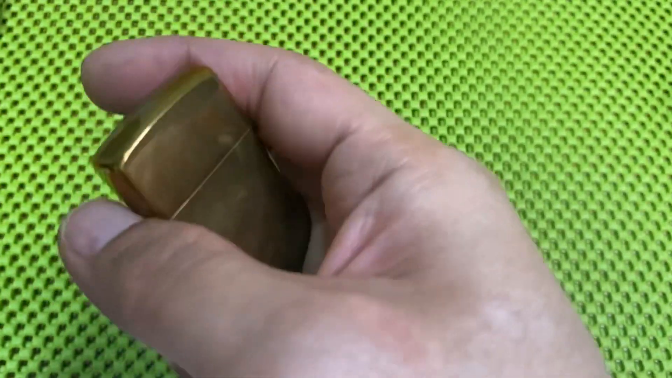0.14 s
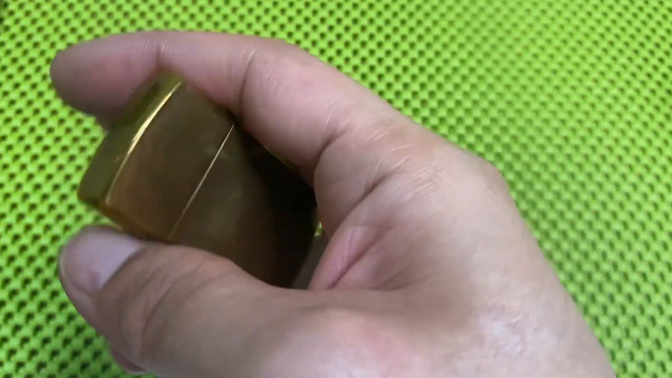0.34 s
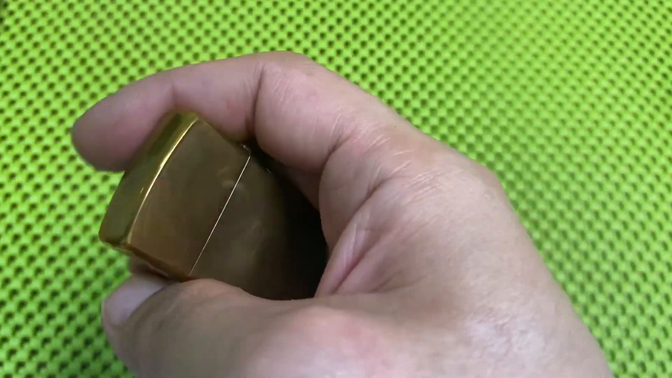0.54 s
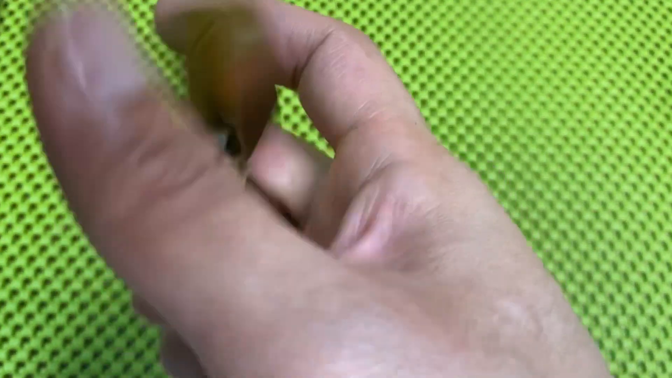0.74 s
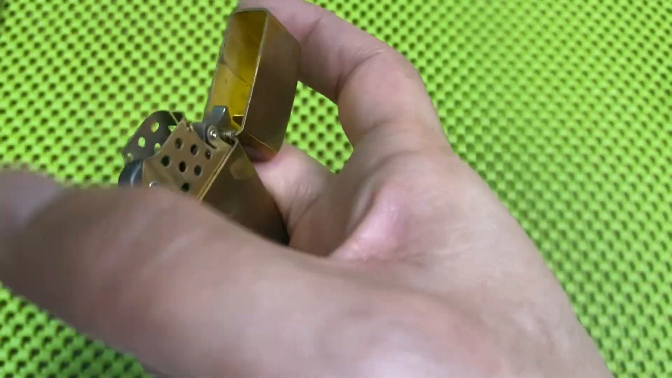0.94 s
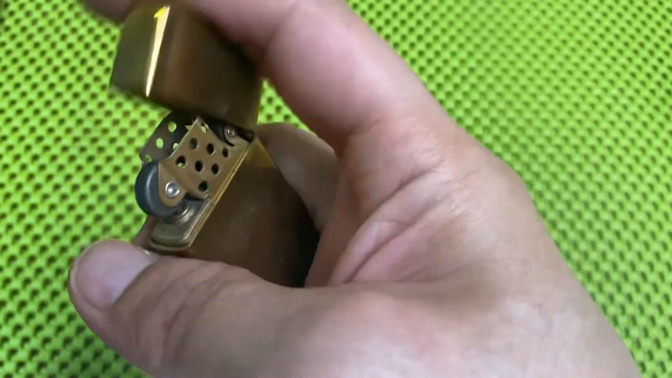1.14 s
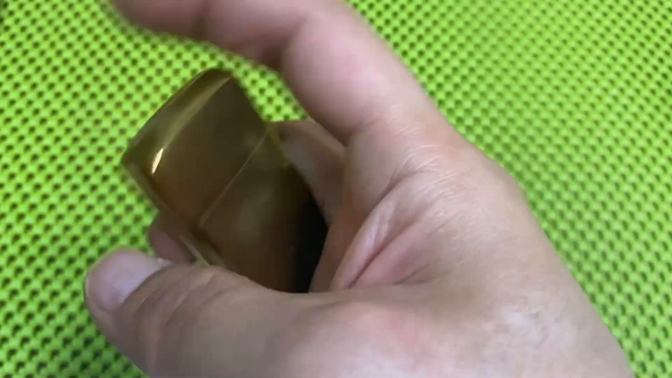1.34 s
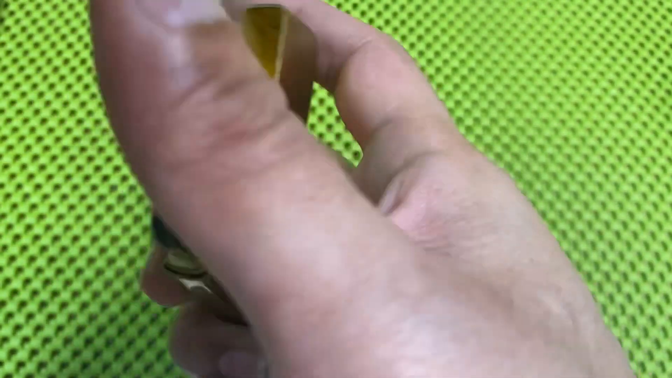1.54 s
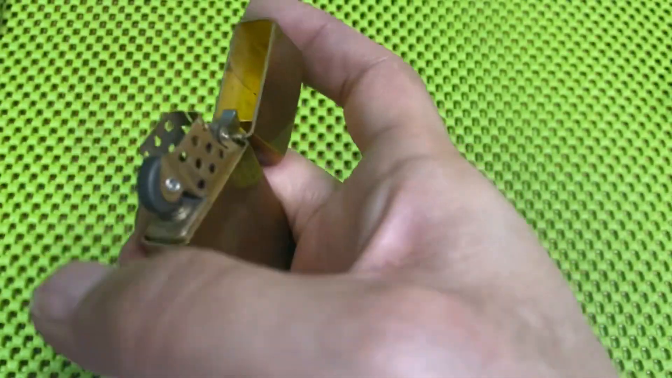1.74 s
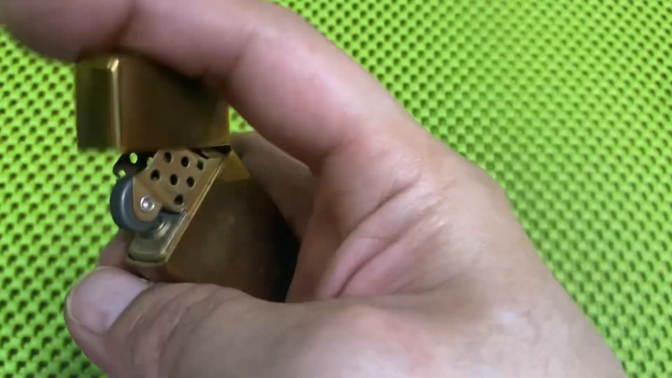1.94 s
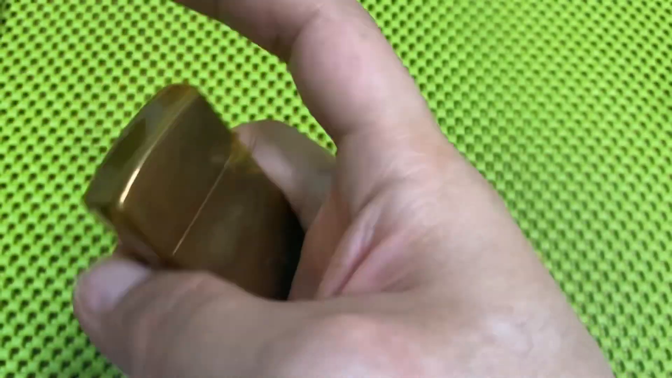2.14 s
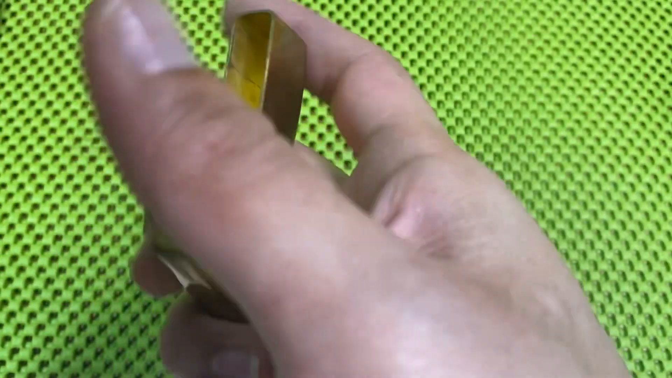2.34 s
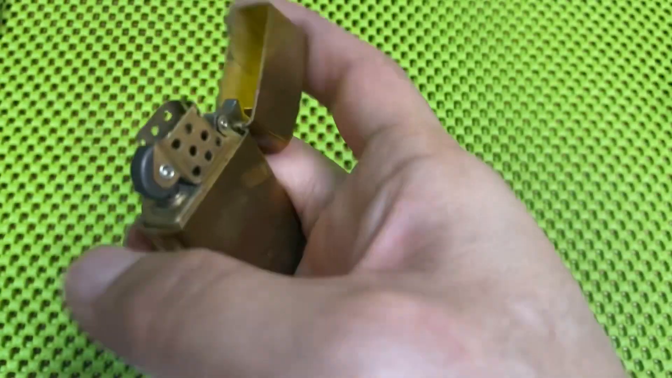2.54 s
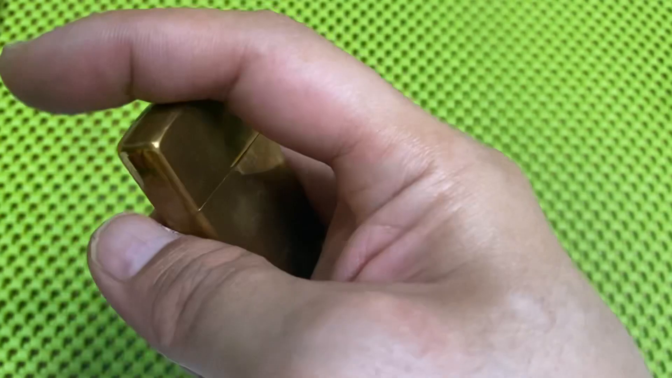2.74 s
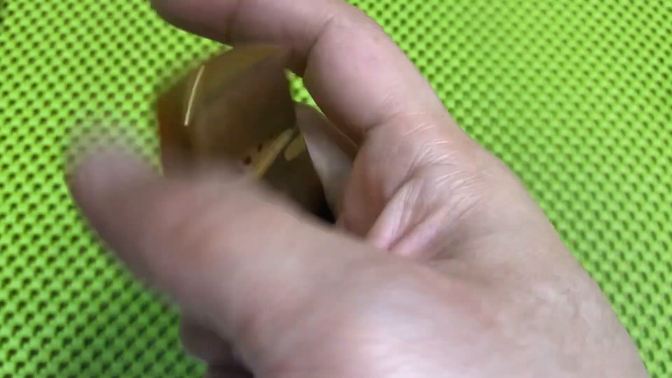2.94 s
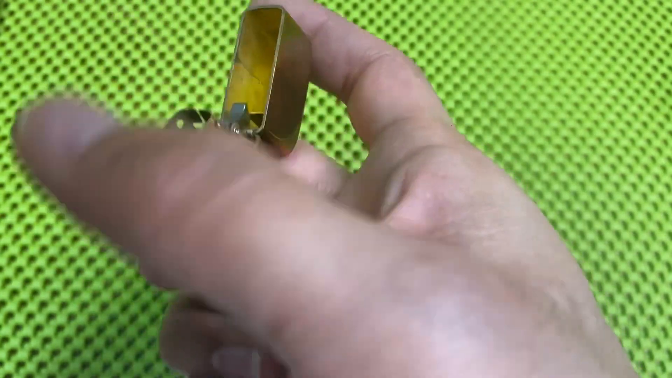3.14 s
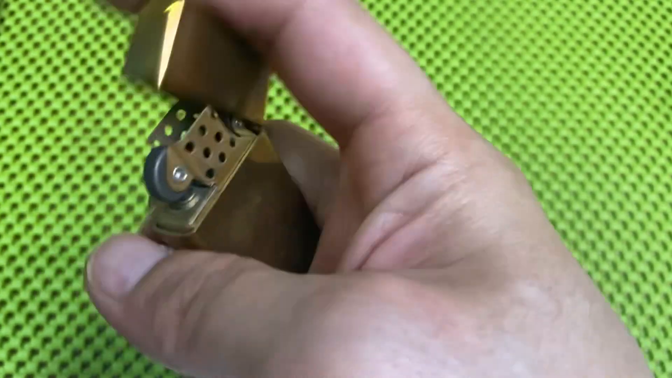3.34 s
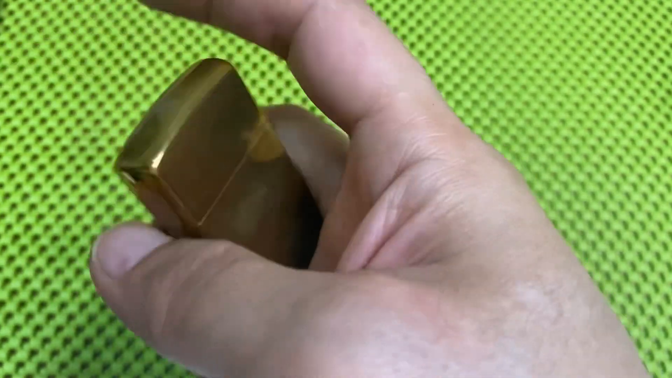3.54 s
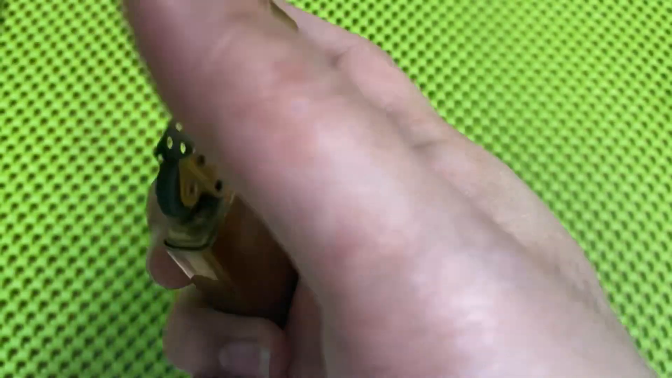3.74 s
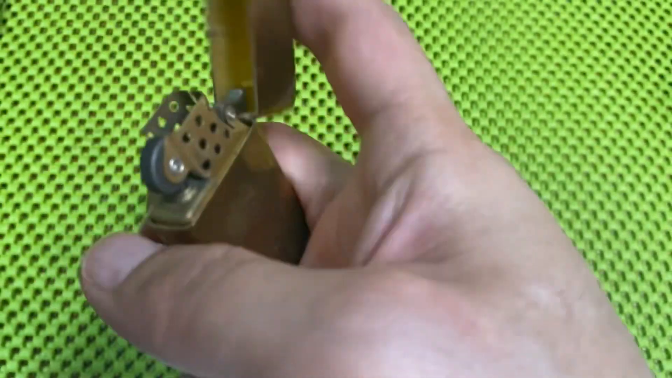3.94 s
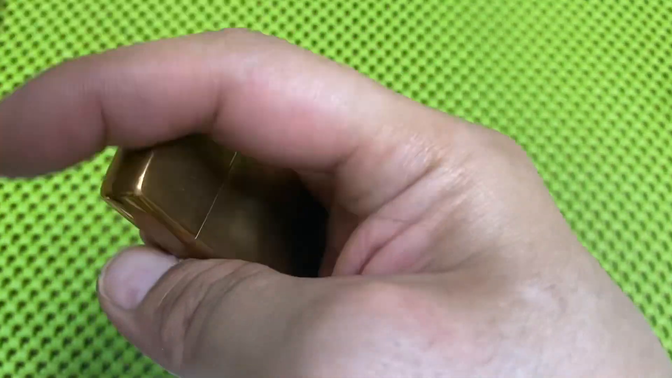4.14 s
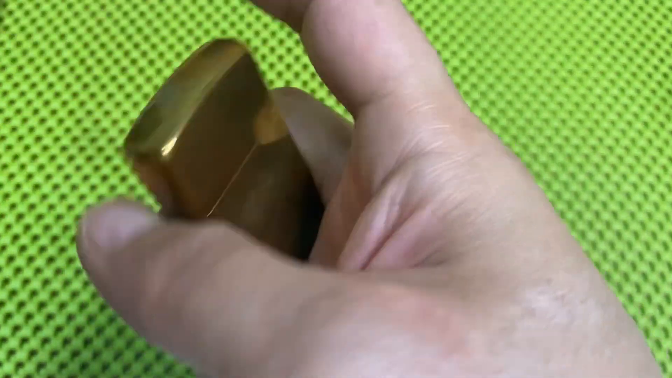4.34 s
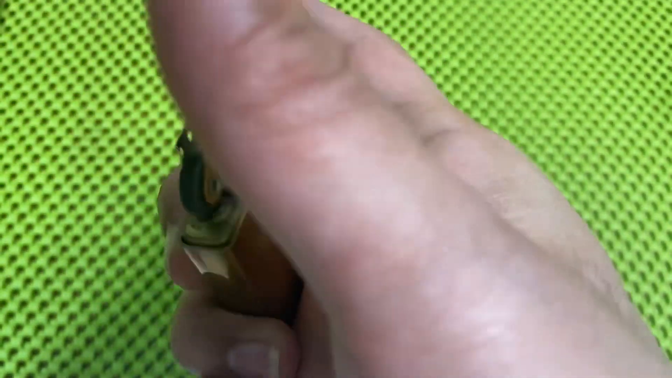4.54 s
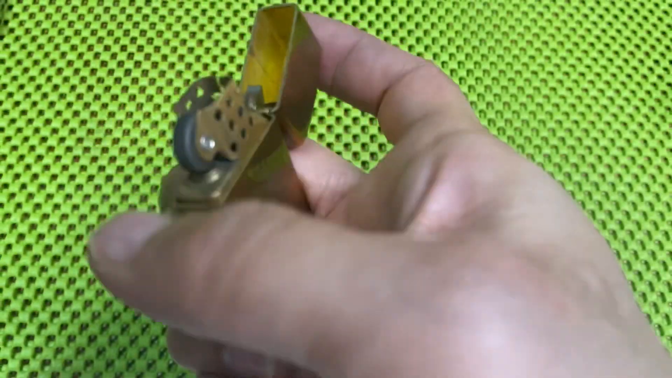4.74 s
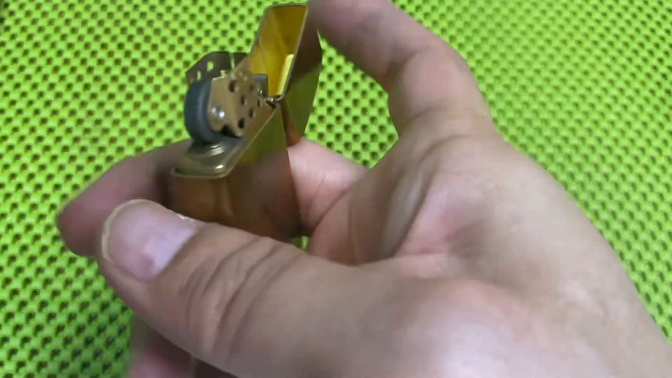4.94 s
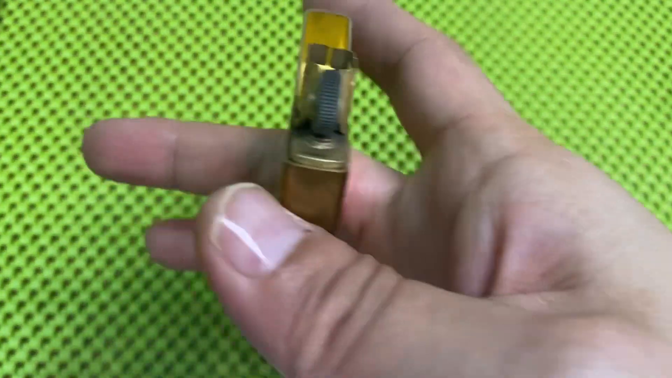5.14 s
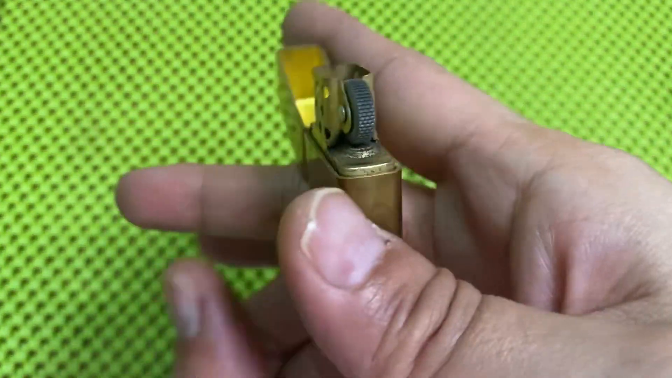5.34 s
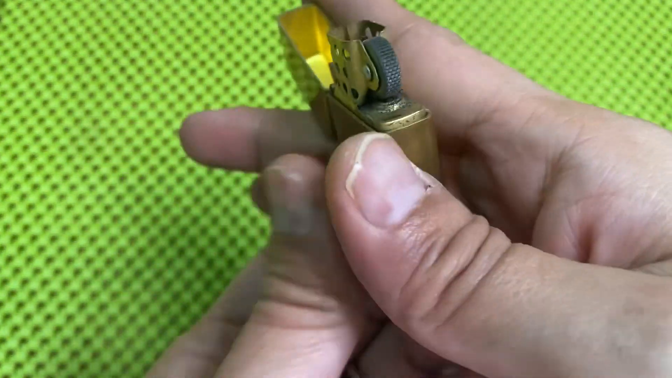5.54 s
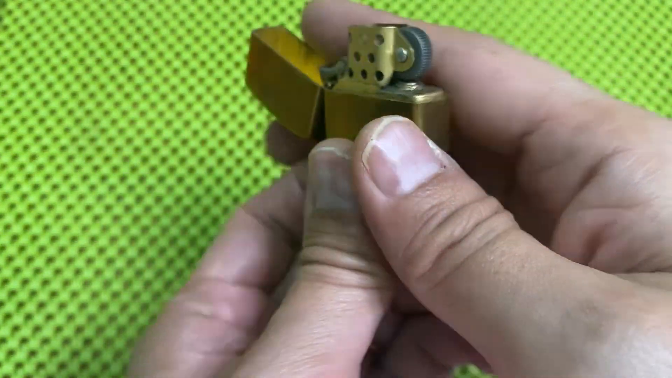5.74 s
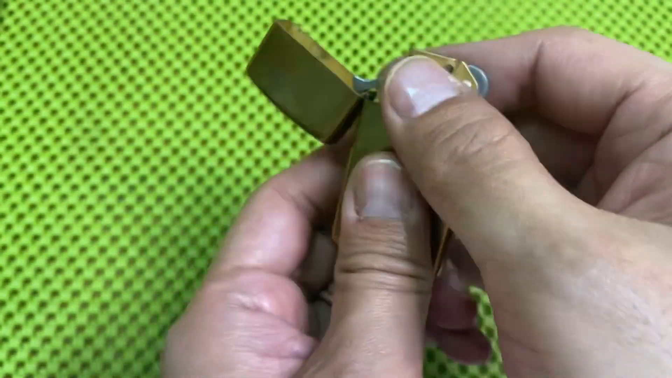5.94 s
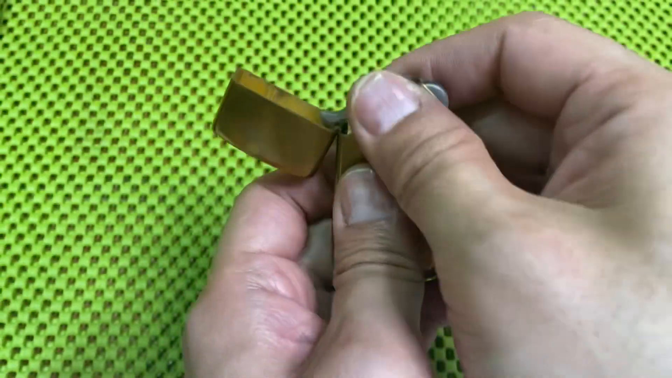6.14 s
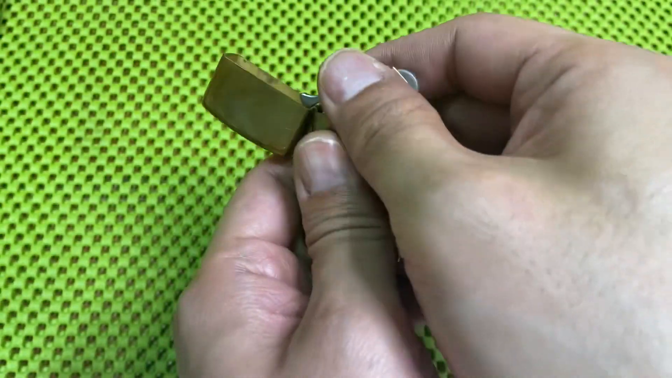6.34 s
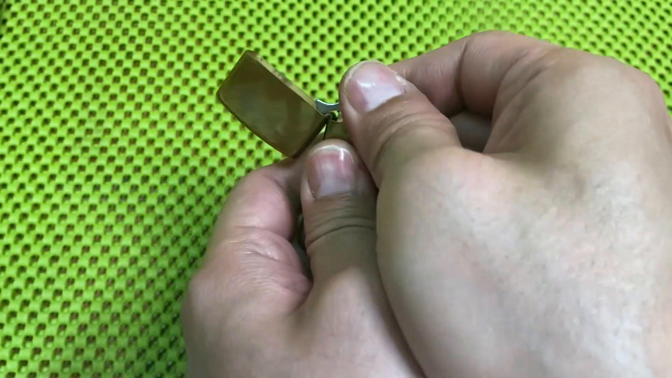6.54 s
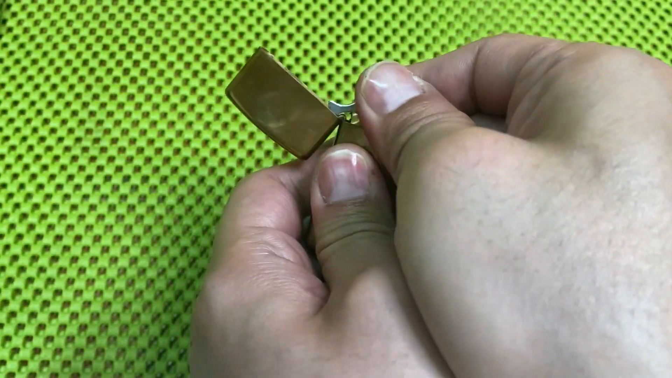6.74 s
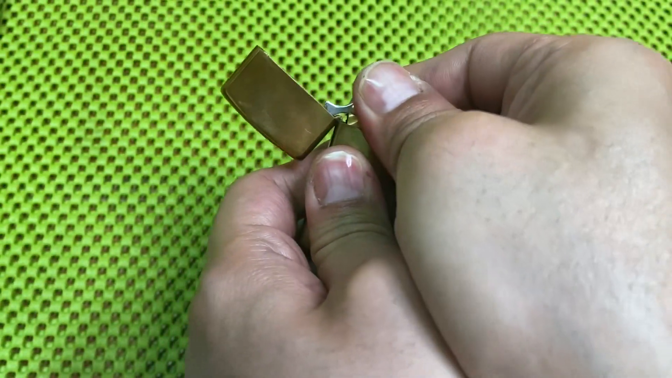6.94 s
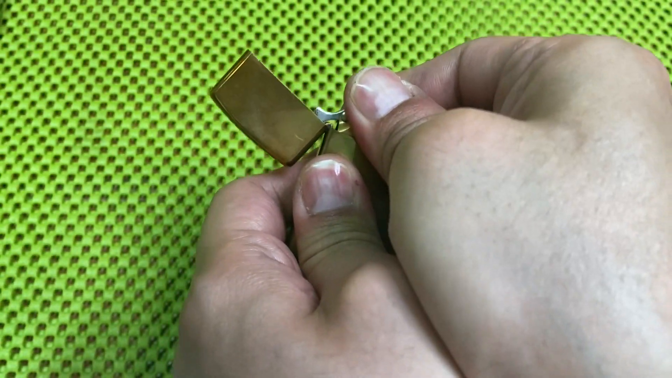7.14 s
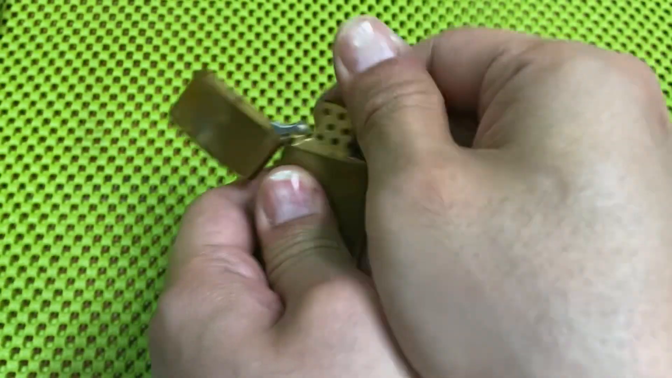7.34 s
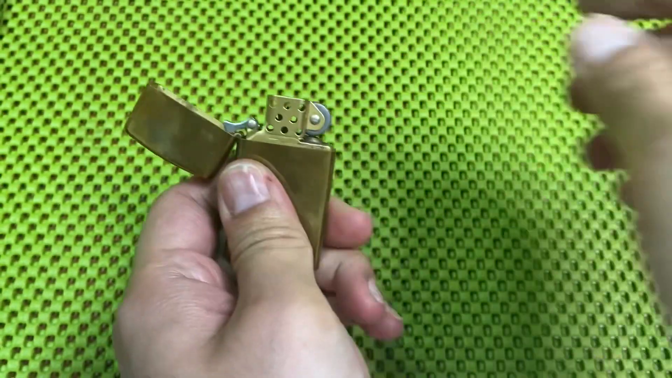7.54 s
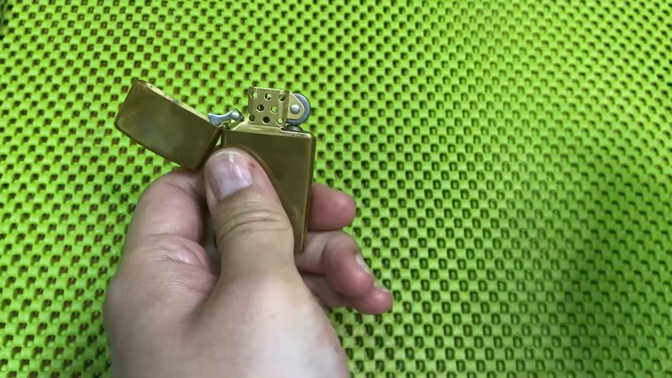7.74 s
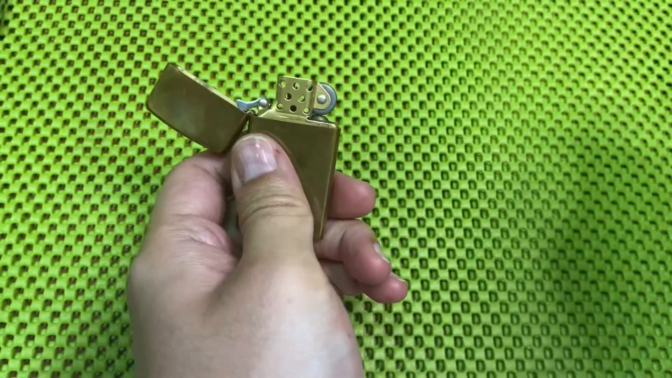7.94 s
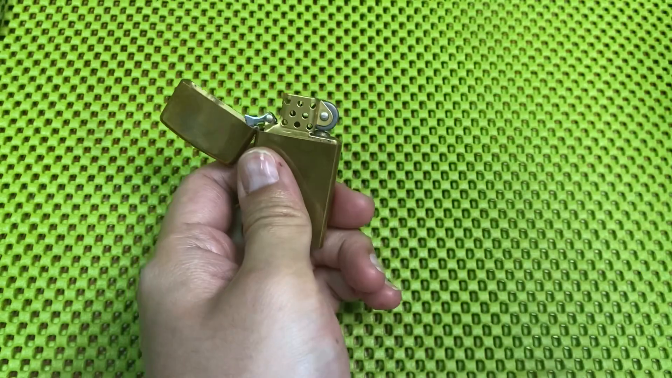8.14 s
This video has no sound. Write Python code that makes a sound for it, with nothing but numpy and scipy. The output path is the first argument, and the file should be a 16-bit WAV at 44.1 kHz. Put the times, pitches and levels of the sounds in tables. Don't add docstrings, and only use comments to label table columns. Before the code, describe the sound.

A quiet, lively room with soft hush and low engine throb through the wall, heard by a close stereo phone; the tail of an earlier snap is fading at the start. At 0.74 s a brass lighter lid is thrown open with a loud, bright crack and short thin ring. It shuts at 1.2 s with a graze and, about 5 ms later, a firmer seating click with a low knock. Openings follow at 1.49, 2.25, 2.97, 3.65 and 4.45 s, closings at 1.98, 2.7, 3.39 and 4.13 s, varying in hardness. Fine ticks come between, and bright reflections decay over roughly half a second as the level ducks briefly. After a faint tick at 4.86 s, very faint skin rubs run from 5.5 to 6.3 s, with tiny ticks at 5.65, 6.53 and 7.33 s and a final rub near 7.35 s. Low engine hum swells, strongest around 6.5-7.6 s, and continues to 8.2 s.

```python
import sys
import numpy as np
from scipy import signal
from scipy.fft import rfft, irfft, next_fast_len
from scipy.io import wavfile
from scipy.ndimage import map_coordinates

SR = 44100
rng = np.random.default_rng(int(sys.argv[2]) if len(sys.argv) > 2 else 0)


def dump_mix(stems):
    frames = np.atleast_2d(stems).T
    limited = np.clip(frames, -1, 1)
    pcm = np.round(limited * 32767).astype(np.int16)
    wavfile.write(sys.argv[1], SR, pcm)


def undo_db(level):
    steps = np.asarray(level, float) / 20
    return 10 ** steps


N = 361179
TIME_S = np.arange(N) / SR
BLOW_S = np.arange(SR // 4) / SR
LEAD_S = 0.03

# time in seconds, nearness in dB.
TRAFFIC_S_DB = [(0.0, -55.5), (1.09, -59), (1.16, -59), (2.96, -64.5), (3.17, -60), (3.49, -58),
                (3.81, -61.5), (4.31, -65), (4.61, -59.5), (5.29, -64), (5.77, -58), (8.19, -57.5)]
# frequency in Hz, level in dB per Hz.
RUMBLE_HZ_DB = [(15, -43), (25, -14.5), (59, -8.5), (87, -2), (118, -14), (155, -7), (233, -14), (330, -19),
                (413, -26.5), (900, -46), (1170, -82.5), (1980, -120)]
# frequency in Hz, level in dB per Hz.
HUSH_HZ_DB = [(290, -18), (500, -5.5), (523, -7.5), (745, -11.5), (1130, -15), (1450, -13), (1830, -19.5),
              (3020, -30), (4850, -38.5), (8880, -46), (12300, -46), (12600, -55), (17000, -56)]
# frequency in Hz, correlation from 0 to 1.
ALIKE_HZ = [(60, 0.75), (180, 0.92), (550, 0.13), (1650, 0.05), (4970, 0.073), (15000, 0.4)]
RUMBLE_DB, HUSH_DB = 5.5, -70.5
HUSH_FOLLOWS = 0.26

# frequency at the start in Hz, glide in Hz per second.
GLIDES_HZ = [(90, 0.07), (73.1, 2), (101, 3.5), (68.2, 1), (73.7, 4), (84.7, 0.87), (84.5, -2.5),
             (82.77, -1), (64.9, 1.15), (49.4, 1.33)]
# time in seconds, level in dB rms.
SWELLS_S_DB = [
    [(0, -44), (1.9, -55), (2.1, -83)],
    [(0, -60.5), (.6, -48), (.9, -67)],
    [(.2, -66), (.55, -50), (1.2, -71)],
    [(2.75, -51), (2.9, -43.5), (3.35, -45.5), (3.5, -55)],
    [(3.55, -46), (5.3, -65.5), (5.7, -51), (6.35, -42.5)],
    [(3.5, -63), (4.15, -53), (4.45, -55.5), (4.8, -49.5), (5.35, -53.5), (5.9, -47.5), (6.35, -57)],
    [(6.35, -54), (6.55, -36), (7.55, -36.5), (7.7, -47)],
    [(7.7, -46.5), (8.19, -46)],
    [(4.3, -55.5), (5.05, -63.5), (5.65, -45), (6.55, -44.5), (7.15, -42), (7.5, -38.5), (8.19, -39.5)],
    [(5.3, -59.5), (8.19, -58)],
]

# time in seconds, crack peak, clack, knock and thump in dB.
OPENS_S_DB = [
    (0.7416, -10.5, -19, -42, -20.5),
    (1.4903, -8.5, -22, -25, -18.5),
    (2.2537, -5, -27, -28, -26),
    (2.9677, -8.5, -23, -22.5, -20.5),
    (3.6458, -12.5, -24, -39, -28),
    (4.4477, -6, -25, -37.5, -43.5),
]
# time in seconds, crack peak in dB, clack in dB, shell ring t60 in seconds.
RIMS_S_DB = [
    (1.2026, -7, -31, 0.02),
    (1.979, -10.5, -30, 0.025),
    (2.6941, -5, -33.5, 0.039),
    (2.701, -16.5, -28.5, .007),
    (3.387, -7.5, -25.5, 0.022),
    (4.129, -5.5, -21, 0.029),
]
# time in seconds, crack peak, force, knock and thump in dB.
SEATS_S_DB = [
    (1.2073, -7.5, -17.5, -13.5, -16.5),
    (1.9831, -8, -18, -26, -48),
    (2.6987, -5.5, -21, -24, -28.5),
    (3.3915, -6.5, -17, -30.5, -24),
    (4.1339, -6.5, -19.5, -48.5, -59),
]
# time in seconds, force in dB.
EARLIER_S_DB = (-.12, -28.5)
# time in seconds, peak in dB, body under 2.5 kHz
# and treble over 9 kHz in dB against the middle.
TICKS_S_DB = [(.693, -60.5, 8, 1), (0.765, -43.5, 15, -12), (1.1052, -46, -13, 0), (1.8857, -44.5, -8, 3.5),
              (2.6, -46, -10, -1), (3.3203, -40, -16, 3), (3.9643, -40, -25.5, 5.5), (4.477, -44, 22, -20),
              (4.855, -53.5, 14, -10), (5.6499, -67, 20, -6), (6.5319, -58.5, -12, -1),
              (6.805, -75.5, -0.5, -6), (7.07, -75.5, -2.5, -7), (7.335, -55.5, -5, -15)]
# frequency in Hz, level in dB per Hz.
TICK_HZ_DB = [(700, -16), (1500, -10), (3300, -0.5), (6000, -2), (8500, 2.5), (11500, 2.5), (16000, -8.5)]

LID_HZ = [3220, 3420, 4050, 7190, 7330, 8410, 10212, 11577, 12900, 15580]
# level in dB, t60 in seconds, level toward the walls in dB, width there in Hz.
LID_MODES = [(-23.5, 0.3, 5.5, 86), (-14.5, 0.019, -6.5, 290), (-17, 0.016, -17.5, 200),
             (-6.5, 0.021, -1, 100), (-9.5, 0.055, 7.5, 170), (-3, 0.025, -22, 120), (-8.5, 0.083, -2, 100),
             (-4.5, 0.09, -3, 100), (-24.5, 0.027, -5.5, 400), (-17.5, .06, -16.5, 450)]
# frequency in Hz, width in Hz, level in dB.
CASE_HZ_DB = [(8490, 1500, -18.5), (10380, 870, -4), (12595, 900, -7), (14230, 1300, -2.5),
              (15316, 800, -1)]
# frequency in Hz, level in dB per Hz.
CLACK_HZ_DB = [(470, -23), (800, -13), (2050, -9.5), (2860, -6), (3140, -7), (4190, -6.5), (5490, -13),
               (6280, -5), (9500, -5), (12400, -35.5), (20900, -120)]
# frequency in Hz, level in dB.
RIGHT_HZ_DB = [(300, -1), (1200, 0), (2200, 5), (5500, 4), (7500, 1), (9000, 0)]
SHELL_HZ = 11590
RING_DB, OPEN_WALLS_DB, OPEN_DUCK_DB = -22, -30.5, 2.5
SEAT_CLACK_DB, SEAT_T60_S, OPEN_T60_S = 3, 0.0084, 0.0038
LIFT_S, LIFT_DB = 0.019, -43.5
DUCK_FROM_DB = -29.5

# frequency in Hz, level in dB per Hz.
SHUT_WALLS_HZ_DB = [(1200, -10), (2280, -3.5), (2420, -9.5), (3300, -5.5), (7900, -7), (10000, -4.5),
                    (12200, -8.5), (14500, -10.5), (15700, -7.5)]
# frequency in Hz, level in dB per Hz.
OPEN_WALLS_HZ_DB = [(1200, -33.5), (2950, -35.5), (3500, -10), (6400, -26.5), (8200, -17.5), (10000, -19),
                    (12000, -17), (15500, -17.5)]
# frequency in Hz, t60 in seconds.
ROOM_HZ_S = [(1000, 0.53), (3000, 0.72), (7000, 0.8), (12000, 0.66), (16000, .55)]
# frequency in Hz, level in dB.
HOLLOWS_HZ_DB = [(8300, 0), (8550, -40), (9500, -40), (9700, 0), (12250, 0), (12500, -22), (13200, -22),
                 (13400, -40), (14300, -34), (14600, 0), (15800, 0), (16000, -55)]
LOOSE_S = 2.7
FIST_DB, LOOSE_DB = 13.5, 4.5

# time of full contact in seconds, hold in seconds, level in dB.
RUBS_S_DB = [
    (5.476, .03, -87),
    (5.612, 0.026, -75),
    (5.724, 0.032, -79.5),
    (5.785, 0.035, -76),
    (5.868, 0.084, -81.5),
    (6.036, 0.037, -78.5),
    (6.23, 0.069, -80),
    (7.33, 0.053, -74.5),
    (7.41, .03, -89),
]
# frequency in Hz, level in dB per Hz.
SKIN_HZ_DB = [(1180, -40.5), (2000, -20), (3250, 1), (5770, -14.5), (7590, -9.5), (8660, -31.5),
              (10600, -3.5), (13500, -25), (15600, -7.5), (16500, -38)]
RUB_ATTACK_S, RUB_RELEASE_S = 0.05, 0.1


def unit(x):
    return x / np.sqrt(np.mean(x ** 2) + 1e-20)


def along(points, hz):
    f, v = np.transpose(points)
    return np.interp(np.log(hz + 1), np.log(f + 1), v)


def curve(rows):
    s, value = np.transpose(rows)
    return np.interp(TIME_S, s, value)


def wobble(rate_hz):
    knots = rng.standard_normal(int(N * rate_hz / SR) + 4)
    return map_coordinates(knots, [np.arange(N) * rate_hz / SR])


def filtered(x, response):
    n = x.shape[-1]
    m = next_fast_len(n + 8192)
    return irfft(rfft(x, m) * response(np.fft.rfftfreq(m, 1 / SR)), m)[..., :n]


def add(x, s, sound):
    i = round(s * SR)
    part = sound[..., max(-i, 0):x.shape[-1] - i]
    x[..., max(i, 0):max(i, 0) + part.shape[-1]] += part


def peaks(modes, hz):
    return np.sqrt(sum(undo_db(db) ** 2 / (1 + (2 * (hz - c) / w) ** 2) ** 1.455 for c, db, w in modes))


def burst(rise_s, t60_s, channels=1):
    decay = np.maximum((LEAD_S - BLOW_S) / rise_s, (BLOW_S - LEAD_S) / t60_s)
    return rng.standard_normal((channels, len(BLOW_S))) * undo_db(-60 * decay)


def snaps():
    shut = [EARLIER_S_DB, *[(s - 0.003, force_db) for s, _, force_db, *_ in SEATS_S_DB]]
    opened = [(s, OPEN_WALLS_DB, 1, OPEN_DUCK_DB) for s, *_ in OPENS_S_DB]
    return opened + [(s, db, 0, db - DUCK_FROM_DB) for s, db in shut]


def rush(spectrum):
    def mid_side(hz):
        turn = np.arccos(np.clip(along(ALIKE_HZ, hz), -1, 1)) / 2
        return undo_db(along(spectrum, hz)) * [np.cos(turn), np.sin(turn)]

    mid, side = filtered(rng.standard_normal((2, N)), mid_side)
    return unit(np.array([mid + side, mid - side]))


def air():
    near_db = curve(TRAFFIC_S_DB)
    rumble_db = near_db + RUMBLE_DB + 1.7 * wobble(7)
    hush_db = HUSH_DB + HUSH_FOLLOWS * (near_db - near_db.mean()) + 0.75 * wobble(4)
    return undo_db(rumble_db) * rush(RUMBLE_HZ_DB) + undo_db(hush_db) * rush(HUSH_HZ_DB)


def engine():
    tone = np.zeros(N)
    for (hz, glide), rows in zip(GLIDES_HZ, SWELLS_S_DB):
        start, end = rows[0][0], rows[-1][0]
        swell_db = curve([(start - 0.05, -110), *rows, (end + 0.054, -110)])
        t = TIME_S - start
        level = undo_db(swell_db) * undo_db(-0.5 + 1.3 * wobble(7.3))
        tone += level * np.sin(2 * np.pi * (hz + glide * t / 2) * t + 0.1 * wobble(4.1))
    return tone * undo_db([[0.9], [-0.9]])


def wall_colour(s, free):
    if free:
        ring = [(hz, wall_db, width) for hz, (_, _, wall_db, width) in zip(LID_HZ, LID_MODES)]
        return lambda f: np.hypot(peaks(ring, f), undo_db(along(OPEN_WALLS_HZ_DB, f))) * 2
    held_db = LOOSE_DB if abs(s - LOOSE_S) < 0.1 else FIST_DB
    return lambda f: undo_db(along(SHUT_WALLS_HZ_DB, f) - np.interp(f, [2330, 2400], [held_db, 0]))


def room():
    out = np.zeros((2, N))
    for s, db, free, _ in snaps():
        hz, t, z = signal.stft(rng.standard_normal((2, SR)), SR, nperseg=256)
        arrive = np.interp(t, [0, 0.014, 0.024, 0.036, 0.065], [0, 0.3, 0.5, 1.35, 1])
        decay = undo_db(-60 * t / along(ROOM_HZ_S, hz)[:, None] - 22 * t ** 2)
        tail = signal.istft(z * arrive * decay, SR, nperseg=256)[1]
        colour = wall_colour(s, free)
        grain = rng.standard_normal(160)
        knots_hz = np.linspace(0, SR / 2, len(grain))
        streaks = lambda f: undo_db(2.2 * (1 - free) * np.interp(f, knots_hz, grain))
        heard = filtered(tail, lambda f: colour(f) * streaks(f) * undo_db(along(HOLLOWS_HZ_DB, f)))
        add(out, s, undo_db(db - 3) * heard)
    return out


def tick(peak_db, body_db, treble_db):
    tilt = [(2700, body_db), (3100, 0.0036), (8500, 0.0039), (9500, treble_db)]
    click = filtered(burst(0.0006, 0.0088), lambda hz: undo_db(along(TICK_HZ_DB, hz)) * undo_db(along(tilt, hz)))
    return undo_db(peak_db + 3.5) * click / np.abs(click).max()


def lift():
    fade = undo_db(LIFT_DB + rng.normal(0, 3) - 60 * BLOW_S / 0.027)
    return fade * (1 - np.exp(-BLOW_S / 0.001)) * np.sin(2 * np.pi * SHELL_HZ * BLOW_S)


def lid():
    t = BLOW_S - LEAD_S
    ring = np.zeros((2, len(t)))
    for hz, (db, t60_s, *_) in zip(LID_HZ, LID_MODES):
        stir = undo_db(-3 + 60 * t / 0.021) * (hz < 9000)
        swell = np.where(t > 0, undo_db(-60 * t / t60_s), stir)
        phase = (hz < 8000) * rng.uniform(0, 3.8, (2, 1))
        ring += undo_db(db + rng.normal(0, 1)) * swell * np.sin(2 * np.pi * hz * t + phase)
    return ring


def shell(f):
    return sum((-1) ** k * undo_db(db) * 1j * f * w / (c * c - f * f + 1j * f * w)
               for k, (c, w, db) in enumerate(CASE_HZ_DB))


def crack(t, t60_s):
    impulse = np.arange(len(BLOW_S)) == round(LEAD_S * SR)
    strike = impulse + 0.69 * burst(0.00073, 1.1 * t60_s) + 0.0053 * burst(0.02, 0.02)
    struck = filtered(strike, shell)
    ring = min(t60_s / 0.012, 1) * undo_db(-60 * t / t60_s) * np.sin(2 * np.pi * SHELL_HZ * t)
    return (0.59 * struck / np.abs(struck).max() + 0.64 * ring) * undo_db(-60 * (t / 0.018) ** 2)


def clack():
    trio = burst(0.0031, 0.01, 3) + 0.37 * burst(0.024, 0.045, 3) + 0.15 * burst(0.047, 0.02, 3)
    noise = filtered(1.1 * trio[0] + trio[1:], lambda hz: undo_db(along(CLACK_HZ_DB, hz)))
    return noise / np.abs(noise).max()


def knock(t):
    tones = np.sin(2 * np.pi * 800 * t) + 2.1 * np.sin(2 * np.pi * 1450 * t)
    return undo_db(-60 * t / 0.0035) * (1 - np.exp(-t / 0.00035)) * tones


def thump(t):
    swell = t / 0.0062 * np.exp(1 - t / 0.0018)
    push = np.sin(2 * np.pi * (230 * t + 0.76 * (1 - np.exp(-t / 0.001))))
    return swell * (push - 0.5 * np.sin(2 * np.pi * 110 * t))


def contact(crack_db, clack_db, knock_db, thump_db, t60_s):
    t = np.maximum(BLOW_S - LEAD_S, 0)
    return (undo_db(crack_db) * crack(t, t60_s) + undo_db(clack_db + 2.5) * clack()
            + undo_db(knock_db) * knock(t) + undo_db(thump_db + 2.5) * thump(t))


def ports(hz):
    tilt_db = along(RIGHT_HZ_DB, hz) / 2
    late_rad = np.interp(hz, [1500, 7000, 17000], [-0.4, 0.67, 14.2])
    return np.array([undo_db(-tilt_db), undo_db(tilt_db) * np.exp(-1j * late_rad)])


def lighter():
    out = np.zeros((2, N))
    for s, *levels_db in TICKS_S_DB:
        add(out, s - LEAD_S, tick(*levels_db))
    for s, *blow_db in OPENS_S_DB:
        add(out, s - LIFT_S, lift())
        add(out, s - LEAD_S, contact(*blow_db, OPEN_T60_S) + undo_db(RING_DB) * lid())
    for s, crack_db, clack_db, t60_s in RIMS_S_DB:
        add(out, s - LEAD_S, contact(crack_db, clack_db, -87, -90.5, t60_s))
    for s, crack_db, force_db, *hand_db in SEATS_S_DB:
        add(out, s - LEAD_S, contact(crack_db, force_db + SEAT_CLACK_DB, *hand_db, SEAT_T60_S))
    return filtered(out, ports)


def fingers():
    level = np.zeros(N)
    for s, hold_s, db in RUBS_S_DB:
        away = np.maximum((s - TIME_S) / RUB_ATTACK_S, (TIME_S - s - hold_s) / RUB_RELEASE_S)
        level += undo_db(db - 60 * np.maximum(0, away))
    grains = rng.standard_normal((2, N)) * undo_db(3.2 * wobble(250))
    ring = [(hz, db, 120) for hz, (db, *_) in zip(LID_HZ, LID_MODES)]

    def colour(hz):
        brass = np.hypot(undo_db(along(SKIN_HZ_DB, hz)), 1.1 * peaks(ring, hz))
        return brass * undo_db(1.4 * along(HOLLOWS_HZ_DB, hz))

    return level * unit(filtered(grains + 0.2 * grains[::-1], colour))


def scene():
    return air() + engine() + room() + lighter() + fingers()


def band_limit(x):
    return signal.sosfilt(signal.butter(12, 17140, fs=SR, output="sos"), x)


def record(dry):
    duck_db = [db * np.interp(TIME_S - s, [0.007, 0.013, 0.07, 0.21], [0, 1, 1, 0])
               for s, _, _, db in snaps()]
    band = lambda hz: undo_db(np.interp(hz, [30, 48, 16300, 17100], [-11.5, 1.5, 1.5, -31.0]))
    heard = filtered(dry * undo_db(-np.max(duck_db, axis=0)), band)
    heard = heard / (1 + np.abs(heard / 0.85) ** 6) ** (1 / 6)
    return band_limit(heard)


dry = scene()
out = record(dry)
dump_mix(out)
```